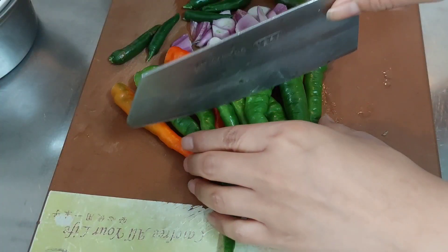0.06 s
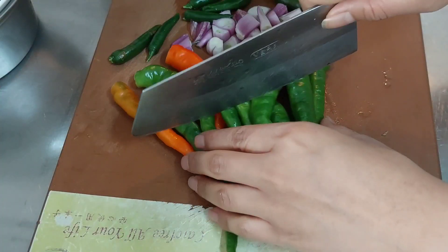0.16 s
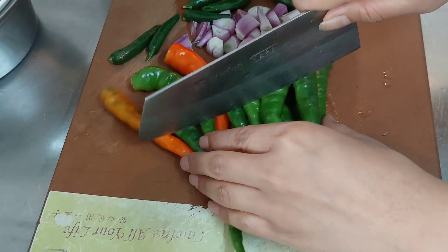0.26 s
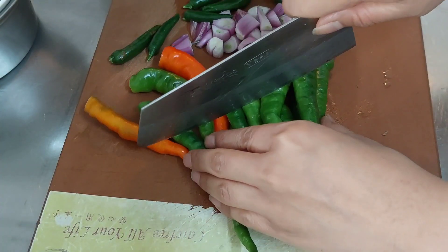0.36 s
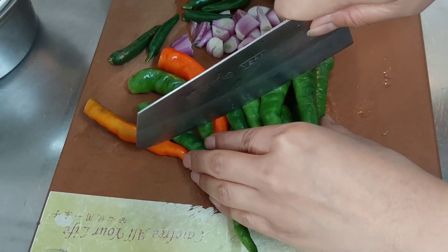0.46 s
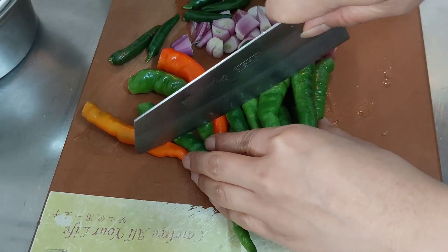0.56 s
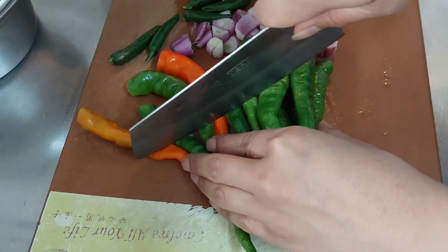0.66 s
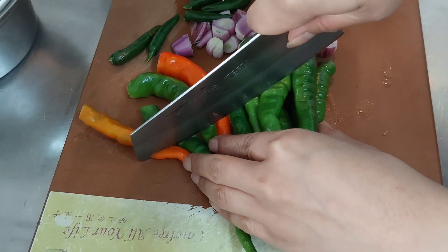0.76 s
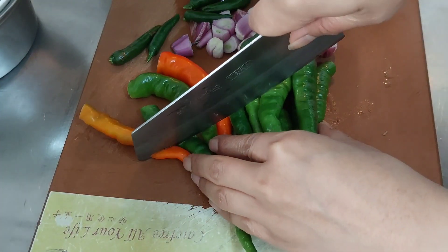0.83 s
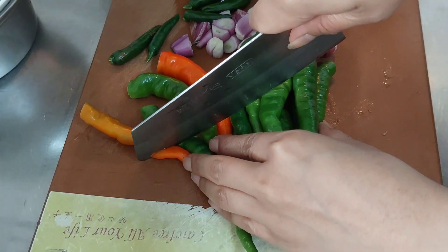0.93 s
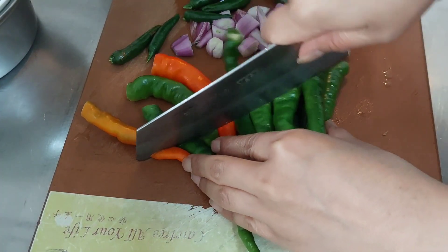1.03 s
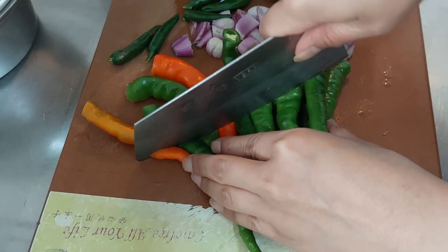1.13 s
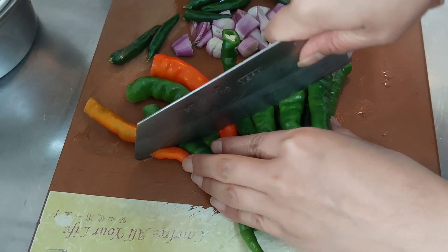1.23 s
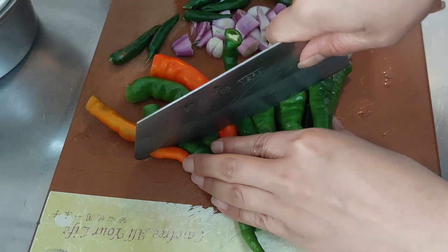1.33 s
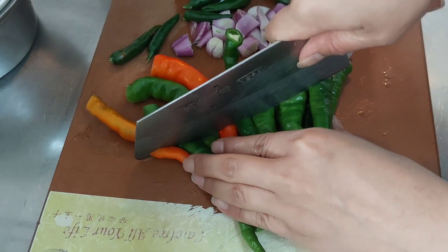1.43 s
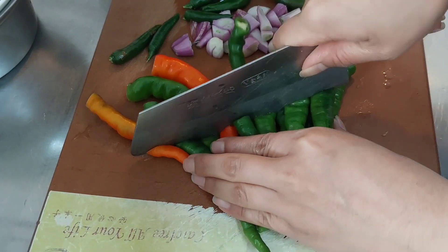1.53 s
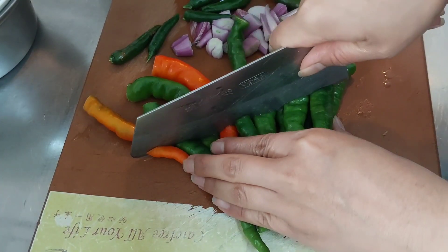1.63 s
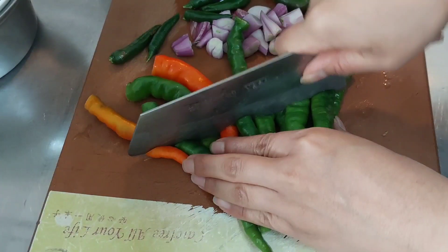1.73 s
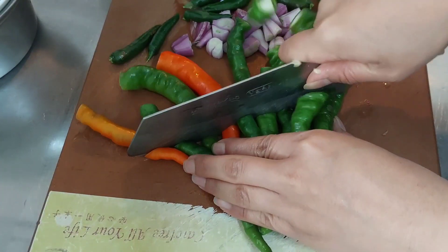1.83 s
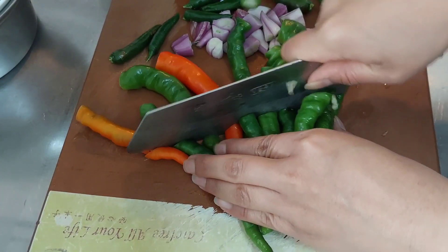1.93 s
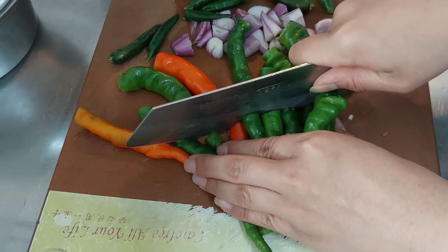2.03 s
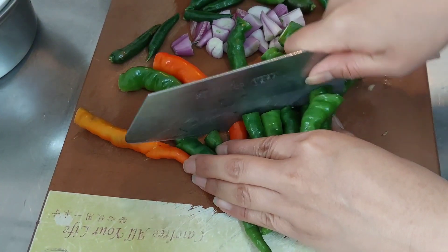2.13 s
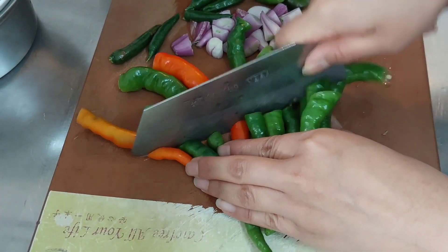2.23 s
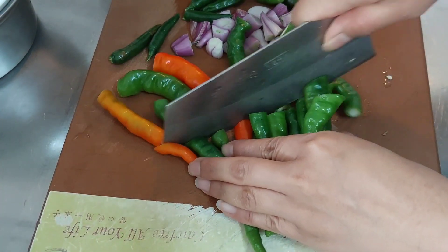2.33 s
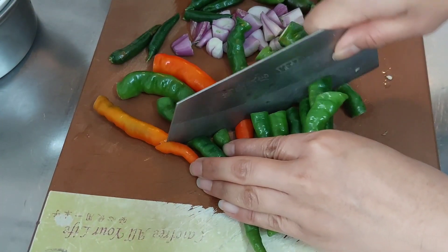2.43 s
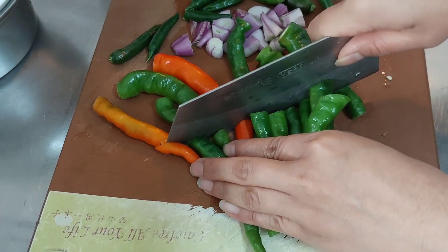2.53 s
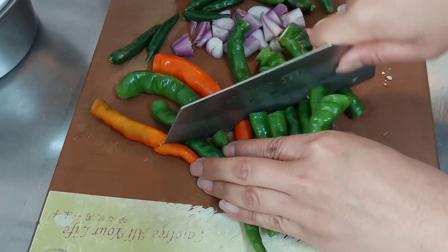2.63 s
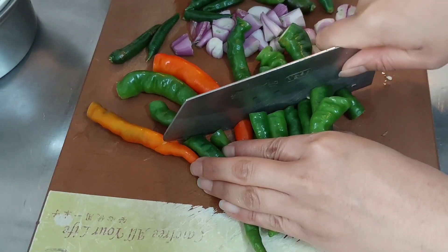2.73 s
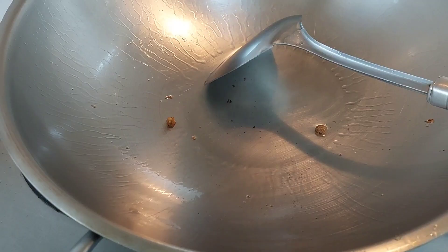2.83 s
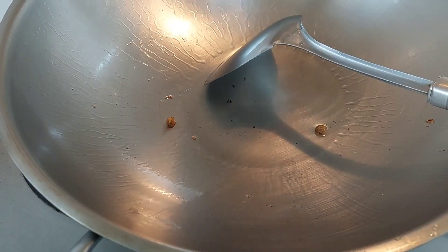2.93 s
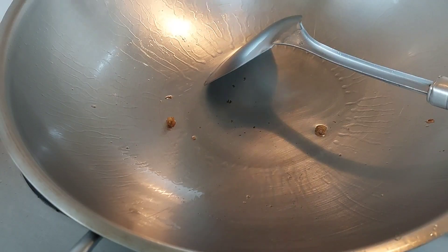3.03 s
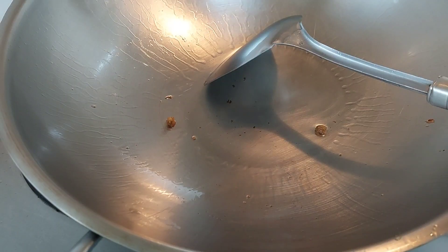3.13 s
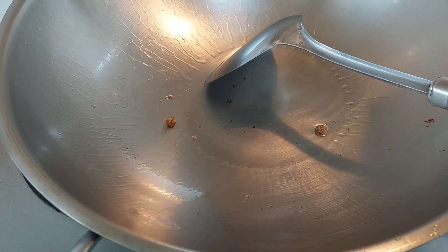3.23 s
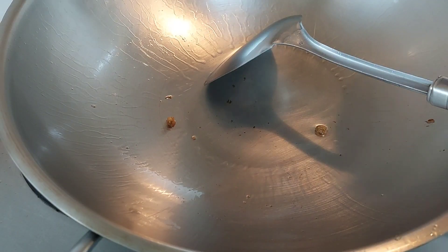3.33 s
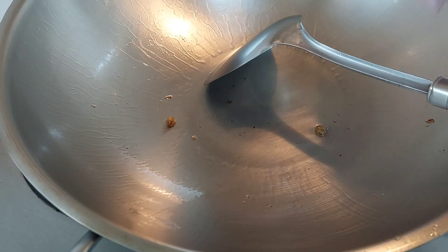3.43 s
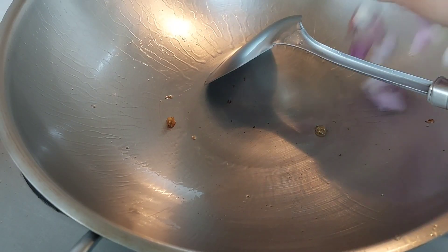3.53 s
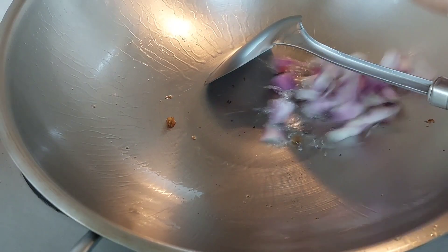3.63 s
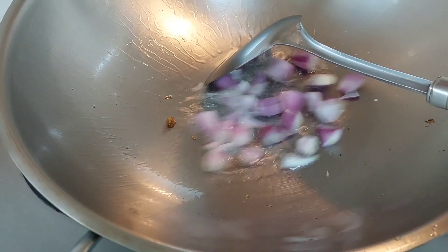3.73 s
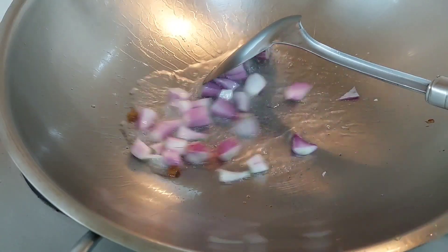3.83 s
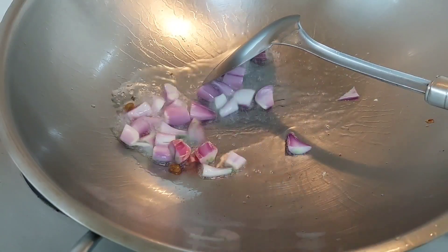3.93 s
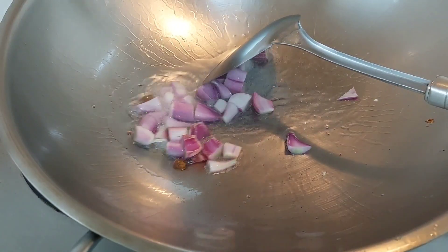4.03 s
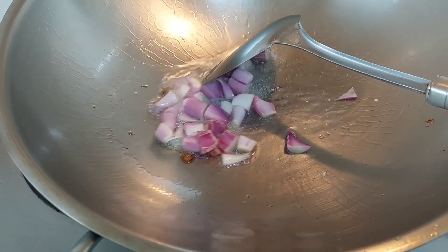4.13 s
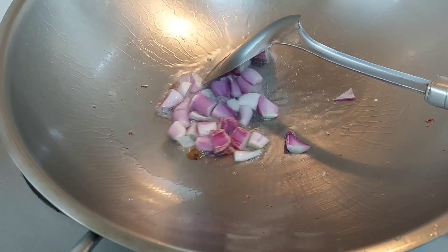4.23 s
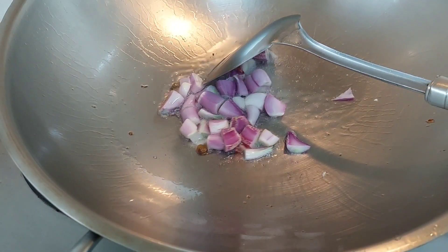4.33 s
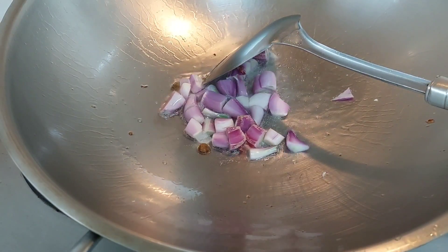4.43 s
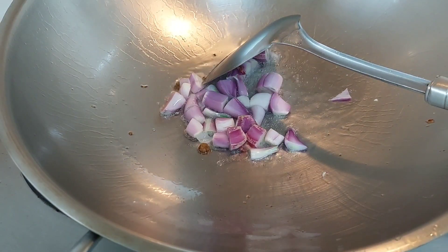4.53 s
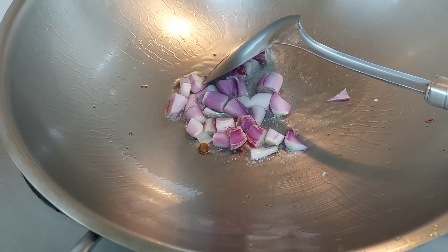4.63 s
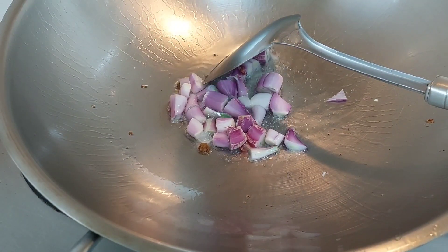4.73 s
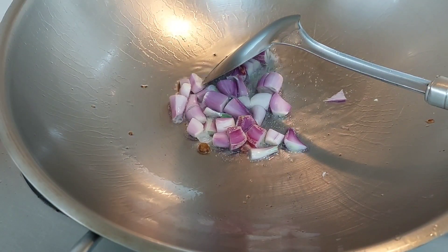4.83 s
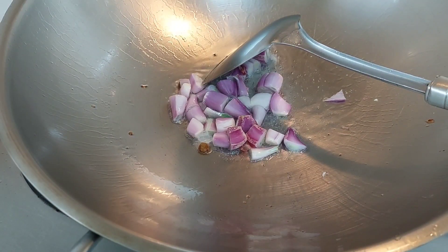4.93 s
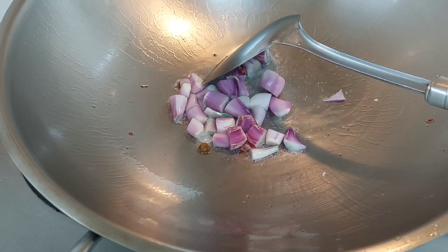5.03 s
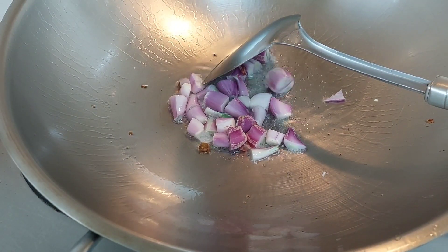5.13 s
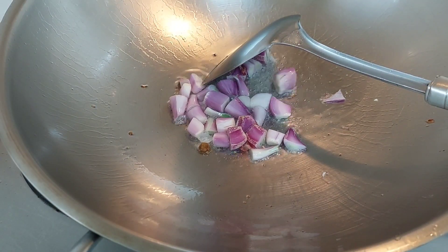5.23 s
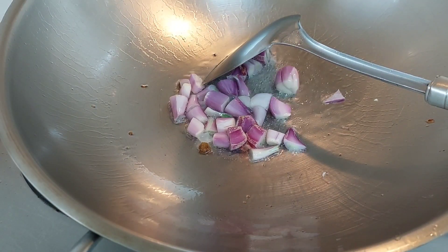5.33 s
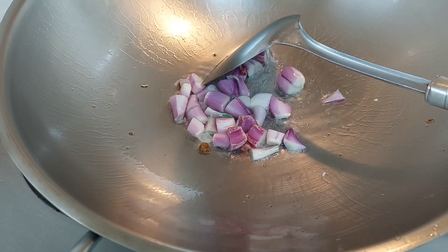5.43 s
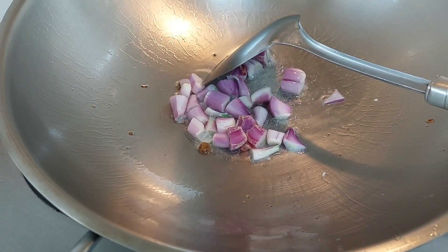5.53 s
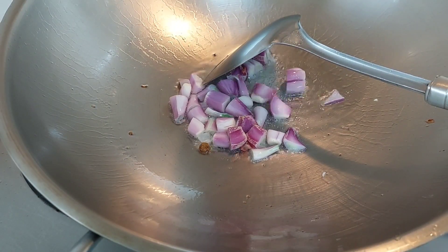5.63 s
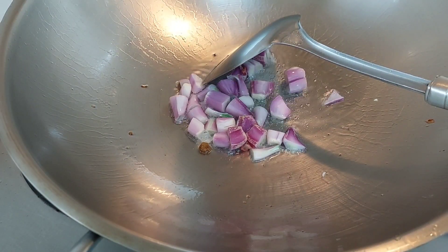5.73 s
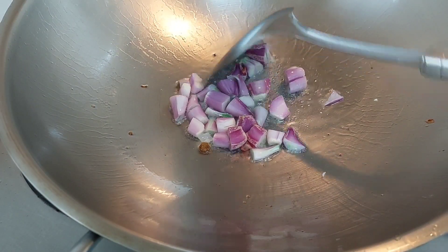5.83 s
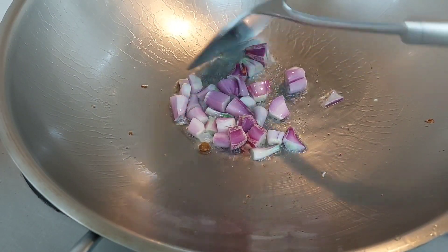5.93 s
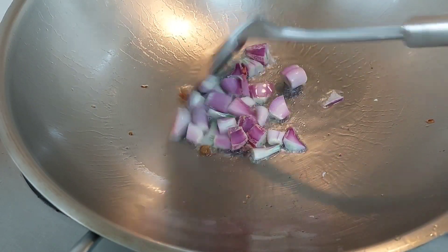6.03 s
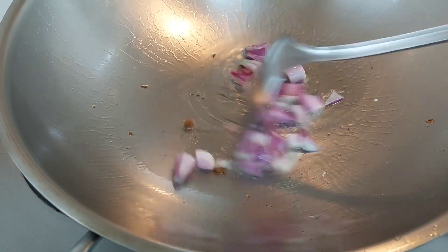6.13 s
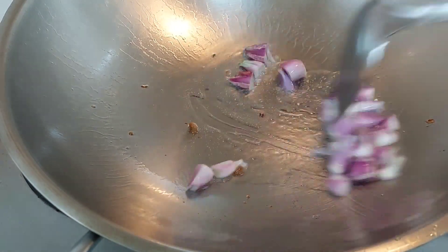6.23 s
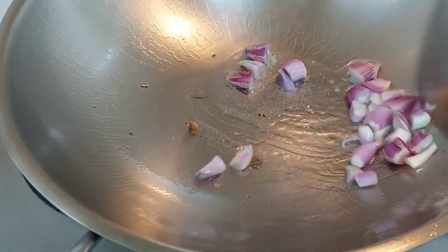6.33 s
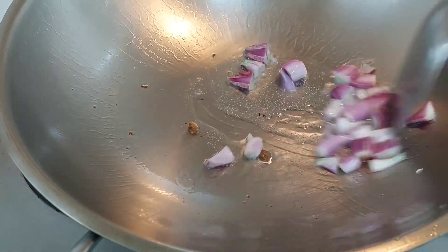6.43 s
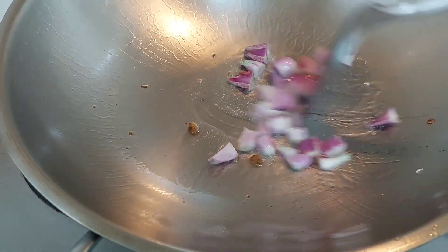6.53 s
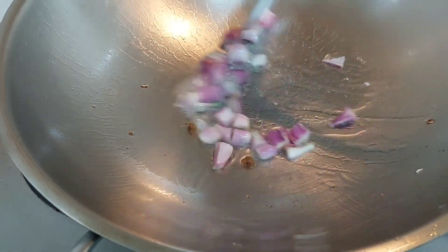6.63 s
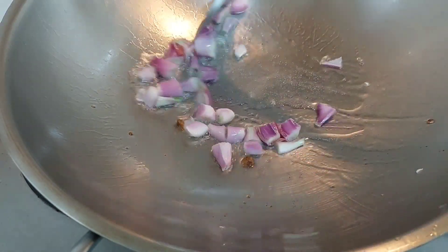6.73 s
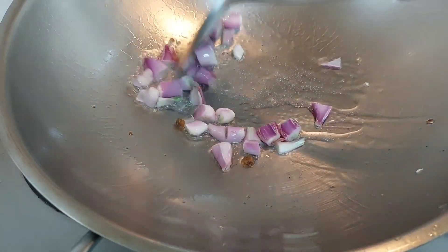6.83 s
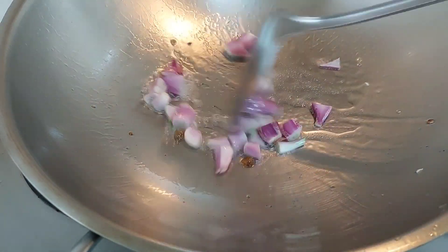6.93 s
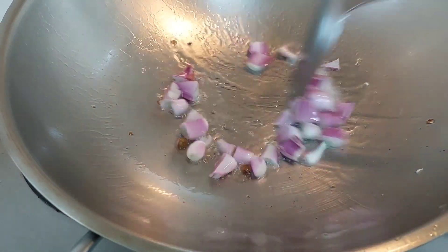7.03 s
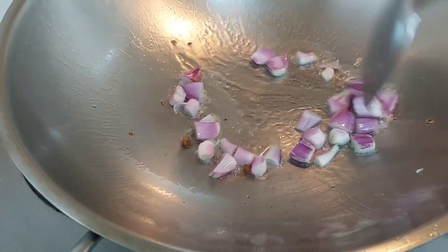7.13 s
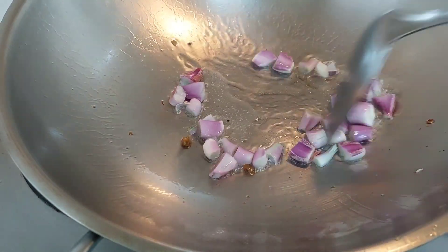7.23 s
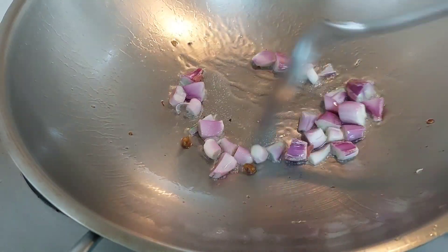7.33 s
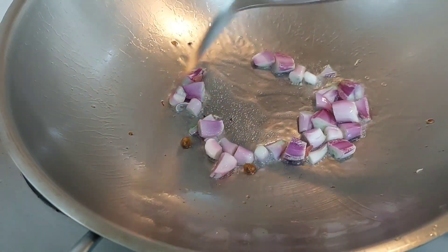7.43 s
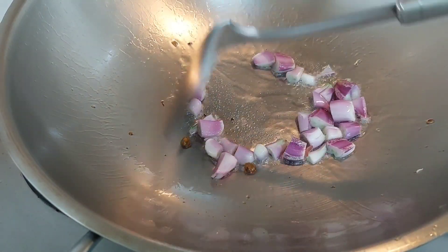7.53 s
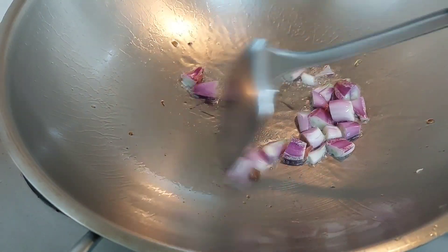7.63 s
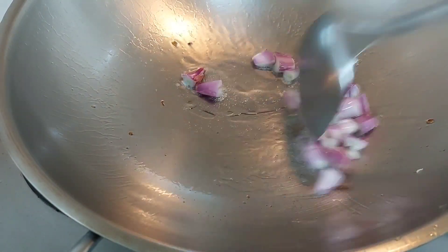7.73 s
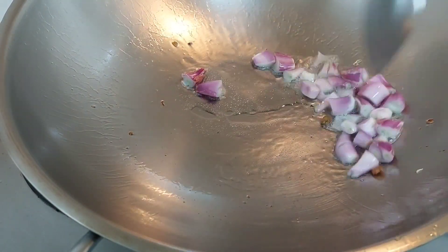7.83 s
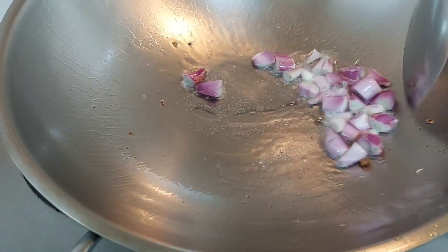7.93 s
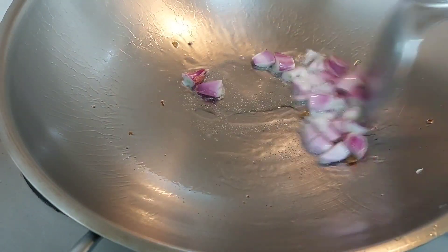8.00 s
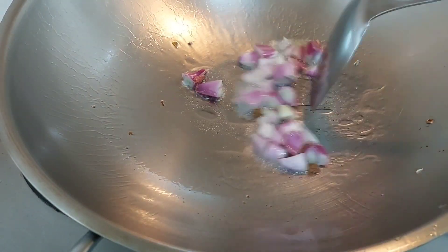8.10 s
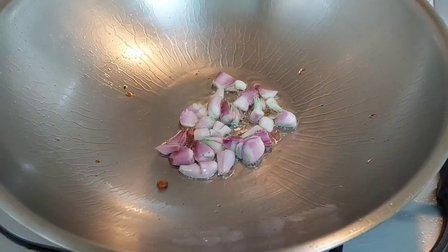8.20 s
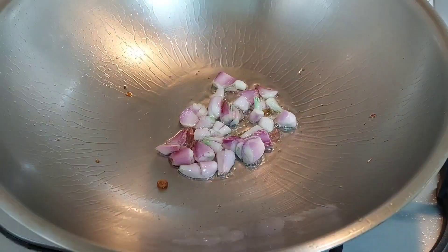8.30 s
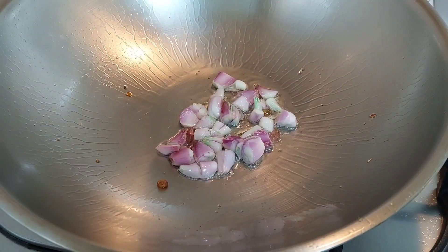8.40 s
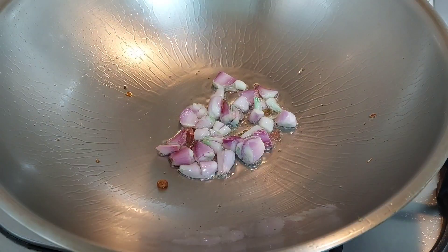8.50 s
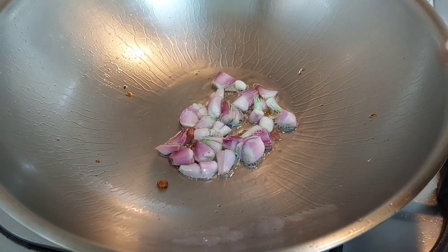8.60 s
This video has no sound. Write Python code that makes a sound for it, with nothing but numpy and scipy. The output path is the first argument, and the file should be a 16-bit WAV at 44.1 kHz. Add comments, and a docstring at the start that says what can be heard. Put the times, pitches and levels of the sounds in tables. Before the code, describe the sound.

A faint appliance hum runs underneath in a small, hard-walled kitchen. From about 0.7 to 2.8 seconds a cleaver chops chilies in roughly eight uneven strokes, each a crisp crunch and snap with a knock on the board, strongest near 1.9 seconds. After a short lull, shallots tumble softly into a steel wok at 3.6 seconds and hot oil bursts into a loud sizzle. It gradually eases into fizzing with sharp pops, over a low rumble, a few dull bumps and light metal taps. From 6 seconds a metal spatula stirs, with short scrapes and one brief squeal, and the sizzle flares with each turn. Ringing clanks land at about 6.6, 7.0, 7.7 and 8.1 seconds, the last two loudest. At 8.2 seconds the frying cuts off into an instant of silence, and a very faint simmer follows until about 8.7 seconds.

```python
"""Shallots sizzle in hot oil in a steel wok: their water flashes to steam and countless bubbles burst, while a
metal spatula excites the bowl by impact and stick-slip friction. Before that, a cleaver fractures the skin and
cells of chilies and knocks on a board. The scene changes after the frying: a brief silence, then a faint
simmer. An appliance hums behind it all in a small, hard-walled kitchen."""
import sys
import numpy as np
from scipy import signal
from scipy.fft import rfft, irfft
from scipy.io import wavfile

SR = 44100
rng = np.random.default_rng(int(sys.argv[2]) if len(sys.argv) > 2 else 0)


def write(x):
    x = np.atleast_2d(x).T
    wavfile.write(sys.argv[1], SR, np.round(np.clip(x, -1, 1) * 32767).astype(np.int16))


N = 381906
TIME = np.arange(N) / SR
RING_TIME = TIME[:SR * 3 // 4]  # time axis of one decay
CHOP_END_S, FRY_END_S, SIMMER_START_S = 2.835, 8.1805, 8.214


def amp(db):
    """Amplitude ratio of a level in decibels."""
    return 10 ** (np.asarray(db) / 20)

def unit_rms(x):
    """Power normalisation to rms 1."""
    return x / np.sqrt(np.mean(x ** 2) + 1e-20)

def burst(x):
    """Energy normalisation: a transient gets the energy of 10 ms at rms 1."""
    return x / np.sqrt(np.sum(x ** 2) / (SR / 100) + 1e-20)

def at_frequency(points, hz):
    """Interpolation of (f/Hz, value) points over log frequency."""
    f, value = np.transpose(points)
    return np.interp(np.log(hz + 1), np.log(f + 1), value)

def envelope(points):
    """Gain interpolated from (t/s, level/dB) points, zero before the first."""
    t, db = np.transpose(points)
    return amp(np.interp(TIME, t, db, left=-np.inf))

def add(mix, start, sound):
    """Superposition of a sound from a start time in seconds."""
    part = mix[round(start * SR):][:len(sound)]
    part += sound[:len(part)]

def swell(start, length, db):
    """Cosine-tapered gain: it rises, holds and falls."""
    out = np.zeros(N)
    add(out, start, amp(db) * signal.windows.tukey(round(length * SR), .5))
    return out

def colour(x, spectrum):
    """Minimum-phase filtering to an (f/Hz, level/dB) shape."""
    size = 4096
    log_gain = np.log(amp(at_frequency(spectrum, abs(np.fft.fftfreq(size, 1 / SR)))))
    response = np.exp(np.conj(signal.hilbert(log_gain)))
    taps = np.fft.ifft(response).real[:size // 2]
    return signal.oaconvolve(x, taps)[:len(x)]

def soften(x, hz, order=2):
    """Contact low-pass: a soft blow excites little above its corner frequency."""
    return signal.lfilter(*signal.butter(order, hz, fs=SR), x)

def resonate(x, hz, q):
    """Second-order resonance with a Q of at least 1."""
    return signal.lfilter(*signal.iirpeak(hz, max(q, 1), fs=SR), x)

def decay(t60):
    """Exponential damping by 60 dB in t60 seconds."""
    return np.exp(-np.log(1000) * RING_TIME / t60)

def dense_modes(t60):
    """Modal overlap: crowded modes merge into decaying noise with a flat spectrum."""
    spectrum = rfft(rng.standard_normal(len(RING_TIME)) * decay(t60))
    return irfft(spectrum / abs(spectrum), len(RING_TIME)) * (RING_TIME < RING_TIME[-1] / 2)

def ring(modes, scatter_db):
    """Free vibration: each blow lands elsewhere and weights the damped modes anew."""
    out = 0
    for hz, db, t60 in modes:
        weight = amp(db + scatter_db * rng.standard_normal()) * rng.choice([-1, 1])
        out += weight * decay(t60) * np.sin(2 * np.pi * hz * RING_TIME)
    return burst(out)

def clicks(per_s, spread_db, largest=7.2, size=N):
    """Poisson impulses, mostly small; their levels span up to largest * spread_db."""
    height = amp(spread_db * np.minimum(rng.exponential(1, size), largest))
    return height * rng.choice([-1, 1], size) * (rng.random(size) < per_s / SR)

def drift(bandwidth_hz):
    """Slow random modulation: low-pass noise of rms 1."""
    lowpass = np.exp(-(np.fft.rfftfreq(N, 1 / SR) / bandwidth_hz) ** 2)
    return unit_rms(irfft(rfft(rng.standard_normal(N)) * lowpass, N))


# reverberation time of the kitchen: f/Hz, T60/s
ROOM_T60 = [(100, 0.47), (300, 0.57), (700, 0.35), (1800, 0.32), (5000, 0.31), (14000, 0.27)]
def kitchen(x, wet_db):
    """Reverberation: dense reflections off tiles follow the direct sound, the treble dying first."""
    size = len(RING_TIME)
    reflections = rng.choice([-1., 1.], size) * (rng.random(size) < 5000 / SR) * (RING_TIME > .005)
    hz, t, spectra = signal.stft(reflections, SR, nperseg=256)
    absorption = np.exp(-np.log(1000) * t / at_frequency(ROOM_T60, hz)[:, None])
    tail = signal.istft(spectra * absorption, SR)[1]
    tail = signal.lfilter(*signal.butter(2, 140, "high", fs=SR), tail / np.linalg.norm(tail))
    return (x + amp(wet_db) * signal.oaconvolve(x, tail)[:N]) / np.hypot(1, amp(wet_db))

# spectra of the fan, the mains hum and a thin whine: f/Hz, level/dB
FAN_SPECTRUM = [(25, -27.5), (45, -10), (64, -8), (86, -24), (123, -13), (200, -25.5), (330, -23),
                (450, -27), (800, -23), (1200, -37), (2200, -43.5), (3500, -46.5), (15700, -52)]
HUM_PARTIALS = [(59.2, -64.5), (118.4, -67)]
WHINE_SPECTRUM = [(2300, -36), (2750, -9), (2960, 6), (3130, -2), (3300, -7), (4200, -37)]
def appliance():
    """Broadband fan noise, tonal mains hum and a narrowband whine, each slowly modulated."""
    fan = amp(-59.5) * unit_rms(colour(rng.standard_normal(N), FAN_SPECTRUM)) * amp(0.99 * drift(5))
    hum = sum(amp(db + 1.3 * drift(4)) * np.sqrt(2) * np.sin(2 * np.pi * hz * TIME + 0.31 * drift(3))
              for hz, db in HUM_PARTIALS)
    whine = amp(-79 + 4 * drift(4)) * unit_rms(colour(rng.standard_normal(N), WHINE_SPECTRUM))
    return fan + hum + whine

# spectrum of the rumble near the stove: f/Hz, level/dB
RUMBLE_SPECTRUM = [(25, -11), (42, 2), (60, 4), (110, 4), (170, -15), (300, -8), (700, -30.5)]
# its envelope: t/s, level/dB
RUMBLE_LEVELS = [(3.62, -53), (3.9, -44), (4.15, -61.5), (5.3, -44.5), (5.6, -56), (6.3, -51), (7.35, -43),
                 (8.0, -52)]
# swells of a low drone: t/s, duration/s, level/dB
DRONE_SWELLS = [(4.38, 0.33, -51.5), (4.78, 0.84, -45.5), (5.716, 0.39, -51.5)]
def stove_rumble():
    """Amplitude modulation: low noise and a wavering 120 Hz tone swell and recede."""
    rumble = envelope(RUMBLE_LEVELS) * unit_rms(colour(rng.standard_normal(N), RUMBLE_SPECTRUM))
    drone = np.sqrt(2) * np.sin(2 * np.pi * 120 * TIME + 0.75 * drift(7.4))
    return rumble + drone * sum(swell(*row) for row in DRONE_SWELLS)

# envelope of the simmer: t/s, relative level/dB
SIMMER_LEVELS = [(8.214, -52.5), (8.33, -56), (8.5, -51), (8.66, -53)]
# its spectrum: f/Hz, level/dB
SIMMER_SPECTRUM = [(590, -41), (1000, -23), (1410, -11), (1550, -3), (1760, -12), (2630, -10),
                   (5760, -10.5), (8530, -5.5), (14000, -12.5), (15700, -36)]
def simmer():
    """Faint bubble noise, more reverberant than direct."""
    bubbles = sizzle(SIMMER_SPECTRUM, per_s=5000, spread_db=3.5, flurry_db=3, wet_db=2)
    return amp(-1.1) * envelope(SIMMER_LEVELS) * bubbles

# modes of the board and of the counter under it: f/Hz, level/dB, T60/s
BOARD_MODES = [(194, -4, .17), (227, -10, .15), (338, -10, .15), (437, -3, .15), (517, -2, .14),
               (571, -1.5, .14), (632, -4, .14), (770, -2, .08), (960, -7, .1), (1061, -9, .1)]
COUNTER_MODES = [(56.1, -2.5, 0.37), (101.6, -3.5, 0.43)]
# the board's crowded short modes: f/Hz, level/dB
THUD_SPECTRUM = [(50, 4), (150, -2.5), (300, -2.5), (540, -1.5), (800, 3), (1200, -5), (2500, 7),
                 (6000, -48.5)]
def knocks(blows, ring_db, thud_t60):
    """Impact excitation: a blow rings the board and, with weight behind it, the counter."""
    out = np.zeros(N)
    for t, db, corner_hz, counter_db in blows:
        thud = burst(colour(dense_modes(thud_t60), THUD_SPECTRUM))
        board = thud + amp(ring_db) * ring(BOARD_MODES, scatter_db=1.6)
        board = burst(soften(board, corner_hz, order=3))
        counter = amp(counter_db) * ring(COUNTER_MODES, scatter_db=0.85)
        add(out, t, amp(db) * burst(board + counter))
    return out

# bumps near the stove: t/s, level/dB, corner f/Hz, counter re board/dB
BUMP_BLOWS = [(4.56, -33.5, 118.4, 4), (4.65, -31, 120, 7), (4.89, -31, 120, 16.5),
              (5.1303, -27, 900, -4.5), (5.2, -29, 100, 11), (5.25, -24, 100, 10.5),
              (5.2939, -23.5, 1220, -18.5), (7.38, -35, 150, -10), (7.7, -34.5, 120, 0.5),
              (8.1, -32, 119, 4.5)]
def bumps():
    """Soft impacts excite mainly the low modes and sound dull."""
    return kitchen(knocks(BUMP_BLOWS, ring_db=-15.5, thud_t60=0.079), wet_db=-2)

def snaps(events, crack_db):
    """Impulsive excitation: a broadband crack and the short resonance it drives."""
    out = np.zeros(N)
    for t, db, hz in events:
        crack = dense_modes(t60=0.026)
        resonance = resonate(resonate(crack, hz, q=2.3), hz, q=2.4)
        add(out, t, amp(db) * burst(burst(resonance) + amp(crack_db) * burst(soften(crack, 13000))))
    return out

# the blade brushes the pods between strokes: t/s, duration/s, level/dB
BLADE_BRUSHES = [(0.423, 0.084, -64.5), (1.698, .045, -45), (2.463, 0.13, -60.5)]
# spectrum of tearing flesh, and resonances of the hollow pods: f/Hz, level/dB
CRUNCH_SPECTRUM = [(150, -15), (250, -3.5), (350, 5), (520, -3), (1100, -2), (1500, -5.5), (2340, -14),
                   (3000, -7.5), (4900, -15), (6600, -14.5), (13900, -19.5), (15700, -41.5)]
POD_RESONANCES = [(3200, -16), (4200, -18), (6300, -15)]
# cleaver strokes: tip lands t/s, push before it/s, heel lag/s, crunch level/dB, its rise in the push/dB,
# knock level/dB, corner f/Hz, counter re board/dB
STROKES = [(0.786, .19, 0.011, -55, 5.5, -15.5, 650, -5),
           (1.167, 0.066, .011, -43.5, -2.5, -27.5, 1050, -7.5),
           (1.378, 0.055, 0.0087, -43, 10.5, -46.5, 1200, 4.5), (1.592, 0.038, .023, -31, 22, -24, 780, 5),
           (1.866, 0.085, 0.021, -24.5, 17, -16.5, 1250, -8),
           (2.036, 0.0093, .031, -30.5, 26, -27.5, 1750, 0), (2.304, 0.19, 0.091, -47, 23, -38, 1200, 1.5),
           (2.733, 0.03, .039, -31.5, 12.5, -30, 1150, 9)]
def crunch(fade_db_per_s=252.5):
    """Fracture noise: cell walls crackle as the blade sinks in, fading fast once its heel is down."""
    force = sum(swell(*row) for row in BLADE_BRUSHES)
    for t, push, heel_lag, db, rise_db, *_ in STROKES:
        push_left = np.clip((t - TIME) / push, 0, 1)
        since_heel = np.maximum(TIME - t - heel_lag, 0)
        force += amp(db - rise_db * push_left - fade_db_per_s * since_heel) * (TIME > t - push)
    cells = amp(-0.16) * unit_rms(colour(clicks(per_s=2500, spread_db=1.9), CRUNCH_SPECTRUM))
    skins = sum(amp(db) * unit_rms(resonate(clicks(per_s=90, spread_db=2.7, largest=3), hz, q=7.8))
                for hz, db in POD_RESONANCES)
    return force * (cells + skins)

def cleaver_knocks(heel_db=-1, rebound_s=.043, rebound_db=-7):
    """Repeated impact: in each stroke the tip lands, the heel follows and the blade rebounds once."""
    blows = [(t + lag, db + softer_db, corner_hz, counter_db)
             for t, _, heel_lag, _, _, db, corner_hz, counter_db in STROKES
             for lag, softer_db in ((0, 0), (heel_lag, heel_db), (rebound_s, rebound_db))]
    return knocks(blows, ring_db=-7, thud_t60=0.1)

# sharp snaps and clicks of chopping, including one bright ting of the blade: t/s, level/dB, f/Hz
CHOP_SNAPS = [(0.7865, -34, 3400), (0.796, -36, 5330), (1.082, -49, 6200), (1.0918, -40.5, 5950),
              (1.119, -38, 5560), (1.159, -34.5, 5900), (1.1735, -27.5, 3460), (1.342, -37, 3900),
              (1.3664, -44, 6800), (1.390, -37.5, 6300), (1.5624, -45, 4500), (1.5879, -32, 6600),
              (1.616, -32.5, 6000), (1.7834, -43, 5500), (1.809, -25.5, 6600), (1.8658, -21.5, 3600),
              (1.874, -24, 5600), (1.889, -33, 2960), (2.0224, -45.5, 4000), (2.066, -29, 3600),
              (2.5402, -53, 3230), (2.7103, -43, 3500), (2.7338, -30, 3600)]
def chopping():
    """Fracture and impact: sharp snaps and clicks sound as flesh tears and the blade lands."""
    cutting = snaps(CHOP_SNAPS, crack_db=1.5) + crunch()
    return kitchen(cutting, wet_db=-7.5) + kitchen(cleaver_knocks(), wet_db=-8.5)

# partials of the spatula's squeal: f/Hz, level/dB
SQUEAL_PARTIALS = [(3225, -3), (3418, -5.5), (3618, -5), (4490, -8)]
def squeal():
    """Stick-slip friction drives a few narrow resonances as the spatula's edge catches."""
    slips = clicks(per_s=2500, spread_db=1.6)
    partials = sum(amp(db) * unit_rms(resonate(slips, hz, q=36)) for hz, db in SQUEAL_PARTIALS)
    return kitchen(unit_rms(partials) * swell(start=6.107, length=0.093, db=-26), wet_db=-3.5)

# the spatula slides on the steel: t/s, duration/s, level/dB, chatter f/Hz, Q
SPATULA_SLIDES = [(5.958, 0.075, -43.5, 507, 3.6), (6.024, 0.037, -32, 4000, 7),
                  (6.107, 0.085, -30, 1500, 0.9), (6.568, .035, -24.5, 1440, 2.3),
                  (6.751, 0.12, -35.5, 2840, 1.8), (7.043, .035, -20.5, 1424, 1.71),
                  (7.761, 0.039, -29, 2080, 0.74), (7.879, 0.026, -26, 2520, 1.4)]
def scrapes():
    """Sliding friction: the edge chatters in tiny slips through a broad resonance."""
    out = np.zeros(N)
    for t, length, db, hz, q in SPATULA_SLIDES:
        size = round(length * SR)
        slips = clicks(per_s=2500, spread_db=1.9, size=SR)
        chatter = resonate(resonate(slips, hz, q), hz, q)[size:2 * size]
        add(out, t, amp(db) * unit_rms(chatter) * signal.windows.tukey(size, .5))
    return out

# modes of the wok's bowl and of the spatula's blade: f/Hz, level/dB, T60/s
BOWL_MODES = [(488, -6, 0.11), (587, -7.5, 0.1), (1200, -7.5, 0.084), (1265, -4.5, 0.22),
              (1280, -2.5, 0.06), (1550, -3.5, 0.1), (1934, -6.5, 0.11), (2111, -3, 0.19),
              (3160, 2.5, 0.097), (4580, -3.5, .15), (4735, -7, 0.13), (5910, -2, 0.18), (10630, 3.5, 0.2)]
BLADE_MODES = [(2990, 6.5, 0.086), (3860, -0.5, 0.12), (3989, -0.5, 0.17), (4210, -9.5, .17),
               (4230, -1.5, 0.077), (4610, -6, .18), (5170, 0.5, 0.13), (5370, -2.5, 0.12),
               (5790, -10.5, .12), (6260, -5, .13), (6940, 2.5, 0.11), (7260, -10, 0.16), (7700, -10.5, .2),
               (8420, -5, 0.14), (8100, -9, 0.15), (8700, -7, .15), (10450, -10, .16), (10628, 2, 0.12),
               (11300, 0.5, 0.091), (11800, -6.5, 0.15)]
# the wok's crowded short modes: f/Hz, level/dB
CLASH_SPECTRUM = [(60, -20), (250, -14), (480, -6), (750, -1), (1350, 0), (2000, 6), (2600, -2.5),
                  (3300, 3.5), (6000, -1), (11000, 0), (15500, -3.5)]
# the spatula hits the wok: t/s, level/dB, corner f/Hz, blade re clash/dB, bowl re clash/dB
SPATULA_BLOWS = [(4.5612, -26.5, 4000, -5.5, -18), (5.633, -25, 5000, -4, -9),
                 (5.7359, -31.5, 3020, -6, -18), (6.2821, -25, 1418, -3.5, -14),
                 (6.571, -13.5, 12100, -6, -6), (7.0459, -14, 9830, -15.5, -2),
                 (7.1735, -28.5, 2470, -2, -11.5), (7.5467, -27, 4000, -3.5, -14),
                 (7.6952, -7.5, 11060, -8, -4), (8.065, -10, 7000, 0, -8), (8.072, -6, 11000, 1, -9)]
def clangs():
    """Hard impact of metal on metal sets both bowl and blade in free vibration."""
    out = np.zeros(N)
    for t, db, corner_hz, blade_db, bowl_db in SPATULA_BLOWS:
        clash = burst(colour(dense_modes(t60=0.086), CLASH_SPECTRUM))
        bowl = amp(bowl_db) * ring(BOWL_MODES, scatter_db=0.42)
        blade = amp(blade_db) * ring(BLADE_MODES, scatter_db=0.91)
        add(out, t, amp(db) * burst(soften(clash + bowl + blade, corner_hz)))
    return out

# response of the wok's floor under oil: f/Hz, level/dB
FLOOR_SPECTRUM = [(120, -17), (300, -9), (580, 5), (850, -3), (1200, 5), (1500, -1), (2500, 9), (8000, -6)]
# shallots drop and tumble: t/s, level/dB, corner f/Hz
SHALLOT_FALLS = [(3.622, -48, 900), (3.647, -33, 1190), (3.675, -33, 1092), (3.705, -33.5, 1084),
                 (3.75, -33.5, 900), (3.7913, -27, 1625), (3.84, -40, 906), (3.867, -27, 2500),
                 (3.903, -28, 1390), (4.02, -30, 1500), (4.16, -31, 1600), (4.4374, -30.5, 1400)]
def tumbling():
    """Compliant impact: soft shallots sound the bowl dully."""
    out = np.zeros(N)
    for t, db, corner_hz in SHALLOT_FALLS:
        floor = burst(colour(dense_modes(t60=0.12), FLOOR_SPECTRUM))
        bowl = amp(-2) * ring(BOWL_MODES, scatter_db=2)
        add(out, t, amp(db) * burst(soften(floor + bowl, corner_hz, order=4)))
    return out

# water drops burst: t/s, level/dB, cavity f/Hz
WATER_POPS = [(4.0447, -14, 7740), (4.1188, -26, 8500), (4.2803, -28, 10000), (4.4388, -22, 4630),
              (4.7465, -21.5, 10870), (5.0015, -24.5, 4650), (5.155, -26, 9760), (5.91, -38, 9270),
              (6.1617, -19.5, 9900), (6.3736, -20.5, 10640), (6.8425, -21.5, 3430), (7.2985, -18.5, 10400),
              (7.5514, -19.5, 9200), (7.972, -24, 11000)]
def pops():
    """Explosive boiling: single drops of water burst in the oil."""
    return kitchen(snaps(WATER_POPS, crack_db=-12), wet_db=-1)

def sizzle(spectrum, per_s, spread_db, flurry_db, wet_db):
    """Shot noise: countless bubbles burst in flurries, each ringing for a few cycles."""
    pitches = np.linspace(600, 15500, 14)
    bubbles = sum(resonate(clicks(per_s / len(pitches), spread_db, largest=2.26), hz, q=hz / 3000)
                  for hz in pitches)
    spits = clicks(per_s=600, spread_db=3.6, largest=3.7)
    flurries = amp(flurry_db * np.tanh(drift(55)))
    crackle = (unit_rms(bubbles) + amp(-10) * unit_rms(spits)) * flurries
    return unit_rms(kitchen(colour(crackle, spectrum), wet_db))

# wet shallot meets hot oil, at the drop and at each turn of the spatula: t/s, peak level/dB
OIL_CONTACTS = [(3.48, -60.5), (3.689, -16), (5.15, -35), (6.08, -29.5), (6.24, -30.5), (6.62, -22),
                (6.84, -27), (7.36, -29), (7.98, -27)]
def boiling(lag_s=0, rise_s=0.21, halving_s=0.37):
    """Incoherent sources add in power: each wetting flares up, then wanes as its water is used up."""
    power = np.zeros(N)
    for t, db in OIL_CONTACTS:
        age = TIME - t - lag_s
        flare = amp(db) * np.clip(age / rise_s, 0, 1)
        drying = 1 + np.maximum(age - rise_s, 0) / halving_s
        power += (flare / drying) ** 2
    return np.sqrt(power)

# spectra of the fine fizz and of the coarse bubbling, tinged by the bowl's ring: f/Hz, level/dB
FIZZ_SPECTRUM = [(1500, -18.5), (3000, -6.5), (5000, -7.5), (7500, -4), (10500, -1.5), (13500, -2.5),
                 (15000, -10), (16000, -37)]
BUBBLING_SPECTRUM = [(120, -14), (300, -21.5), (520, -2.5), (900, -2), (1350, -2), (1550, 2.5), (1800, 0.5),
                     (2600, -1.5), (4500, -6.5), (7500, -11), (12000, -14)]
def steam_rush(start_s=3.637, rise_s=0.16, hold_s=0.21, db=-21.5, fade_db_per_s=32):
    """Rapid evaporation: the wet cut faces boil off first, in a smooth band of noise."""
    age = TIME - start_s
    rise = np.clip(age / rise_s, 0, 1) ** 2
    fade = amp(db - fade_db_per_s * np.maximum(age - rise_s - hold_s, 0))
    hiss = resonate(rng.standard_normal(N), hz=6730, q=3.3)
    return rise * fade * unit_rms(colour(hiss, FIZZ_SPECTRUM))

def frying():
    """Flash vaporisation of water in oil: fine fizz, lower bubbling, a first rush and sharp spits."""
    boil = boiling()
    fizz = boil * sizzle(FIZZ_SPECTRUM, per_s=7000, spread_db=2.5, flurry_db=2.5, wet_db=-5.5)
    bubbling = sizzle(BUBBLING_SPECTRUM, per_s=9000, spread_db=5, flurry_db=5, wet_db=-3)
    bubbling *= amp(-6.5) * boiling(lag_s=0.0095)
    rush = steam_rush()
    # nearby droplets spit only once the pan is wet, and grow more slowly than the sizzle
    droplets = resonate(clicks(per_s=70, spread_db=3.5, largest=3), hz=8000, q=1.1) * (TIME > 3.8)
    spits = amp(-25) * unit_rms(droplets) * np.sqrt(boil)
    return fizz + bubbling + rush + spits


def scene():
    """Superposition over the appliance: chopping, frying and, after a short silence, the simmer."""
    board = chopping() * (TIME < CHOP_END_S)
    stove = frying() + kitchen(tumbling() + clangs() + scrapes(), wet_db=-4) + squeal() + bumps()
    simmering = simmer()
    stove = (stove + pops() + stove_rumble()) * (TIME < FRY_END_S)
    sounding = (TIME < FRY_END_S) | (TIME > SIMMER_START_S)
    return ((board + stove + simmering + appliance()) * sounding)[None]

def record(dry):
    """Band and amplitude limiting: a 38 Hz high-pass, clipping at full scale, a 15.9 kHz low-pass."""
    highpassed = signal.lfilter(*signal.butter(5, 38, "high", fs=SR), dry)
    lowpass = signal.firwin(511, 15900, window=("kaiser", 9), fs=SR)
    return signal.oaconvolve(np.clip(highpassed, -1, 1), lowpass[None], "same")


dry = scene()
out = record(dry)
write(out)
```